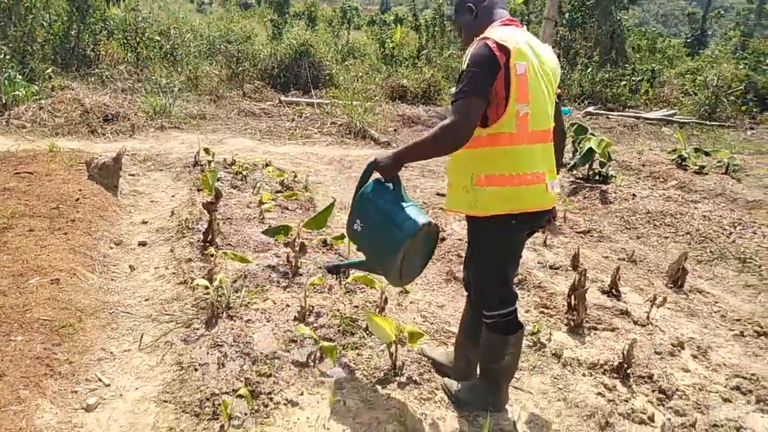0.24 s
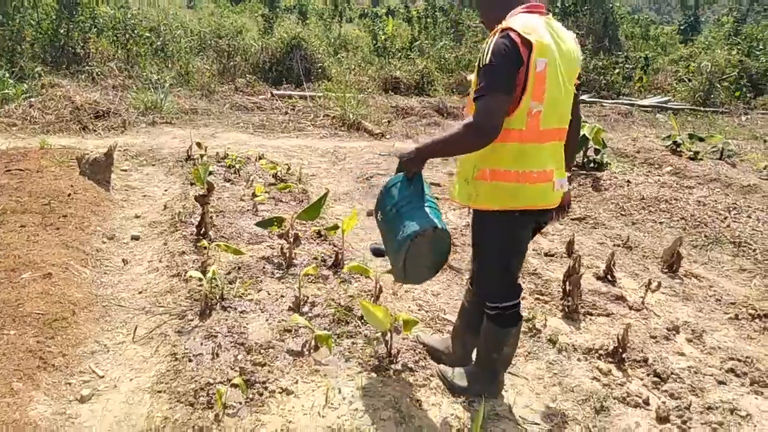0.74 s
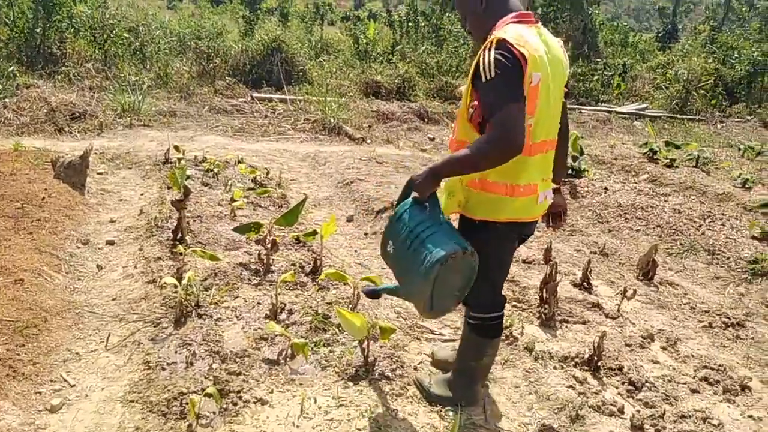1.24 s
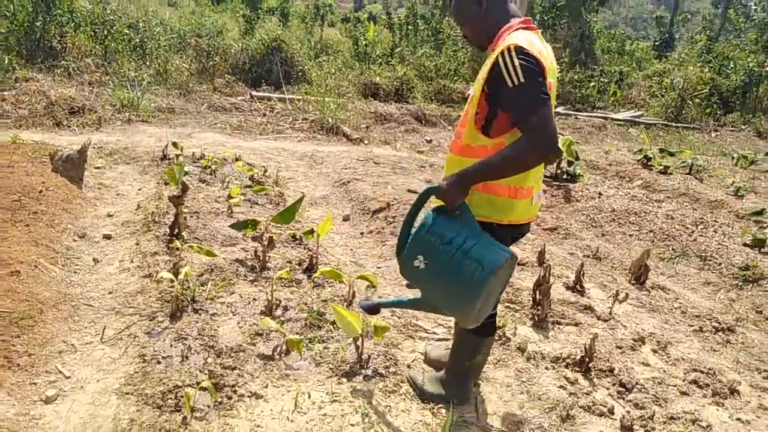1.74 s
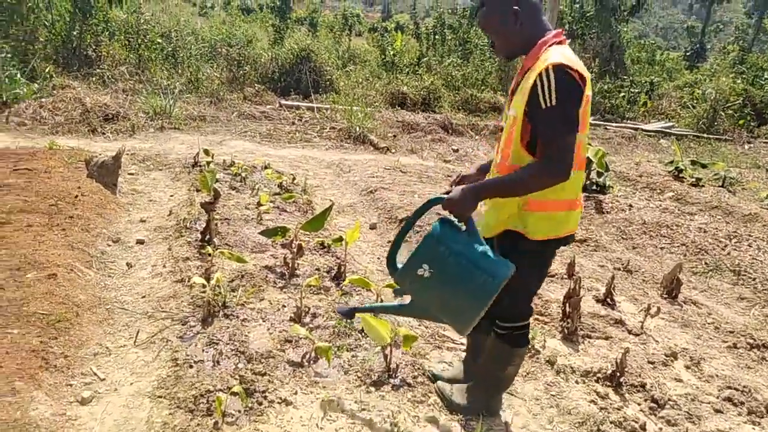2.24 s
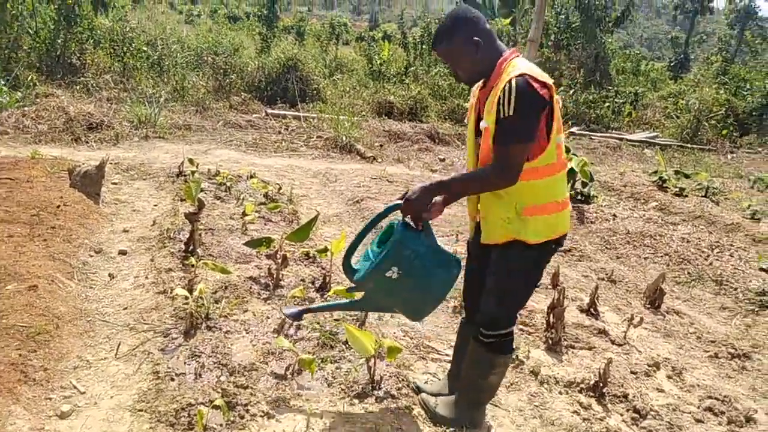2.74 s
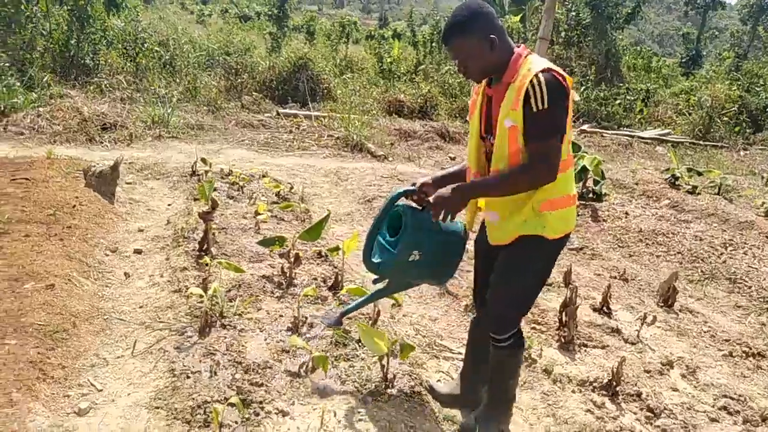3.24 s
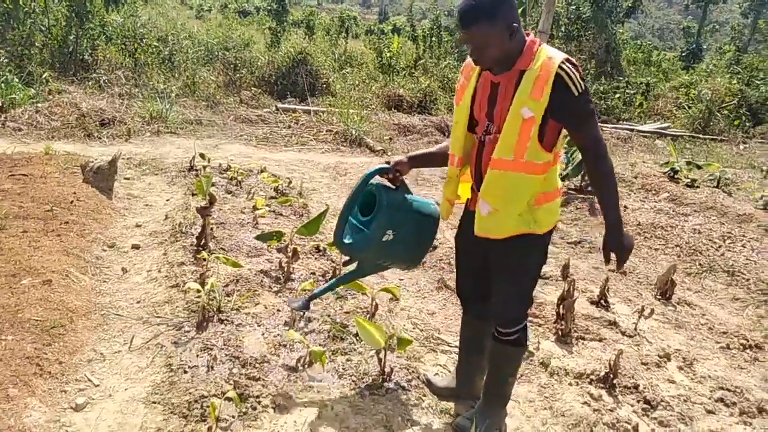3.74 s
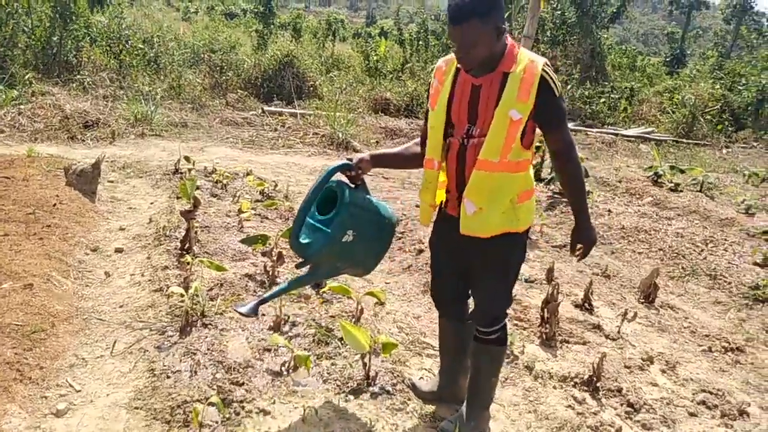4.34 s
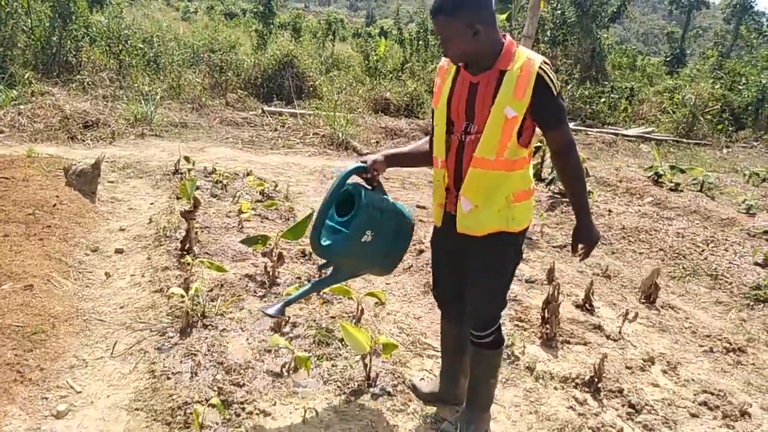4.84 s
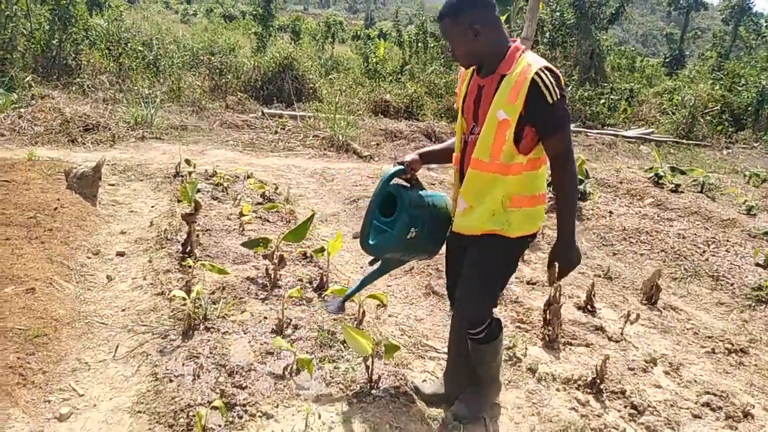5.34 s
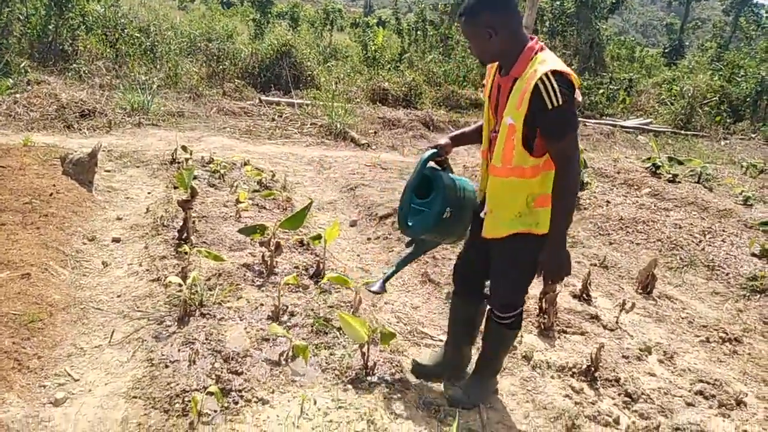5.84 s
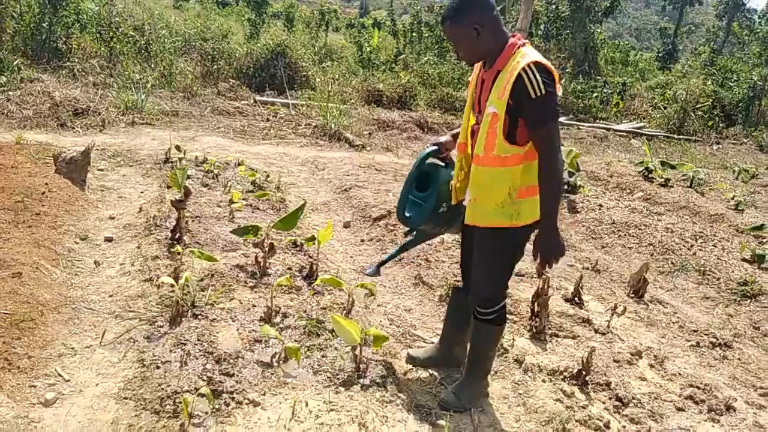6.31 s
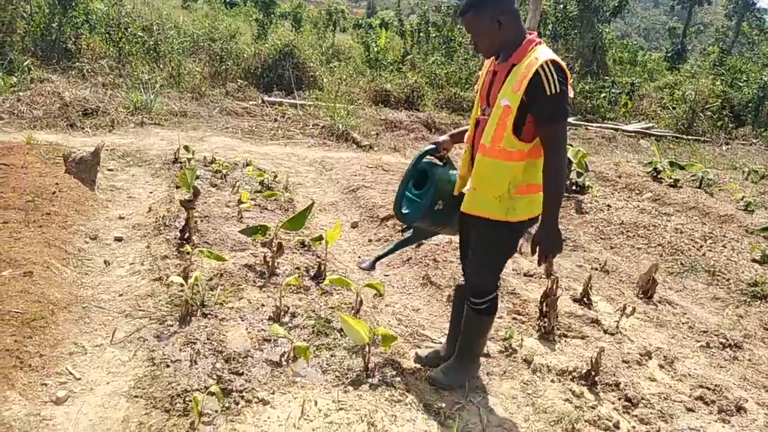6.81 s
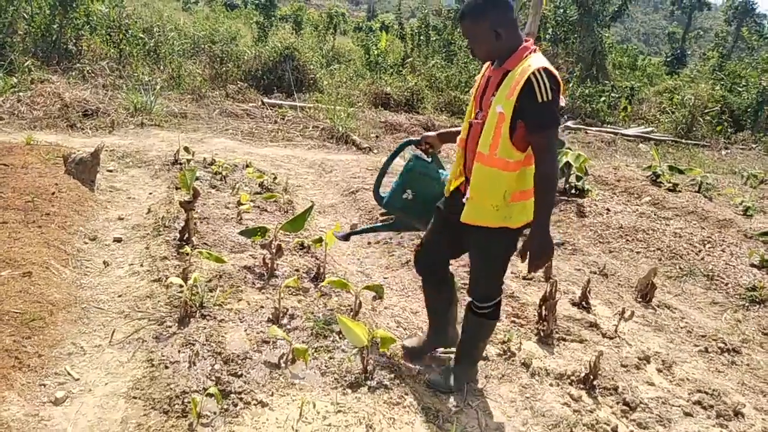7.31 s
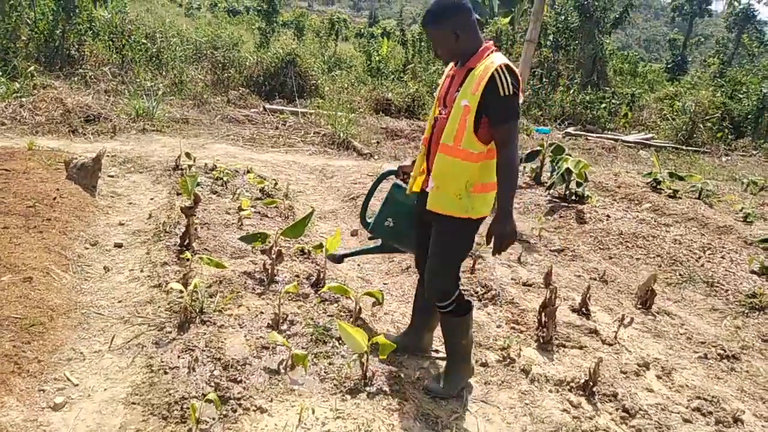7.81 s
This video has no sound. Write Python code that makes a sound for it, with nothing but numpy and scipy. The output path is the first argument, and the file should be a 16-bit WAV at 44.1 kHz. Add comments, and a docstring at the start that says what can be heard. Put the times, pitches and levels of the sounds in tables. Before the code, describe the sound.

Outdoors in a garden, gusts of wind rumble and thump on the microphone, mostly on the right. Close by, rubber boots scuff over dry soil, leaves crackle, and water sloshes and plinks softly in a plastic watering can. The can takes a few hollow knocks, the loudest about three seconds in, followed by a sharp leaf crack. A small bird pipes evenly in the first half; faint chirps and dove coos come later.

```python
"""A garden on a breezy day: a gardener in rubber boots waters seedlings on dry soil near a phone.
Wind eddies buffet the microphone ports, mostly the right. Boots scuff and thud, dry leaves crack,
bubbles plink, water sloshes, the plastic can rings when knocked; short rasps come and go.
A small bird pipes evenly, a dove coos, another bird chirps and an insect's wings buzz,
all over the faint hush of the field."""
import sys
import numpy as np
from scipy import signal
from scipy.fft import rfft, irfft, next_fast_len
from scipy.io import wavfile
from scipy.ndimage import uniform_filter1d

SR = 44100
rng = np.random.default_rng(int(sys.argv[2]) if len(sys.argv) > 2 else 0)


def generate_wav(signal):
    """Clip the signal to [-1, 1] and save it as 16-bit WAV at the path in sys.argv[1]."""
    frames = np.transpose(np.atleast_2d(signal))
    scaled = np.clip(frames, -1, 1) * 32767
    pcm = np.round(scaled).astype(np.int16)
    wavfile.write(sys.argv[1], SR, pcm)


N = 355887
TIME_S = np.arange(N) / SR

# Wind, exposed right port. Each row: time in seconds, two-port mean level in dB, relative edge in dB.
RIGHT_GUSTS = [(0.0, -21, -13.5), (0.49, -32.5, -16), (1.89, -27, -13), (2.13, -26.5, -15),
               (2.49, -24.5, -18.5), (2.83, -29, -18), (3.37, -32.5, -14.5), (3.73, -34.5, -17),
               (4.32, -31, -22), (5.15, -33.5, -13.5), (5.37, -37.5, -14.5), (5.64, -56, -18),
               (5.89, -31.5, -26), (6.22, -41.5, -14.5), (6.43, -28, -11), (6.92, -29, -21.5),
               (7.08, -25.5, -28.5), (7.37, -26, -8.5), (7.6, -33, -4.5), (8.07, -34, -32)]
# Wind, sheltered left port. Each row: time in seconds, level in dB.
LEFT_GUSTS = [(0, -54), (.15, -36), (.45, -63), (.75, -41), (1.3, -35.5), (1.68, -58.5), (1.95, -43),
              (2.25, -61), (2.38, -41), (3.0, -51), (3.6, -56), (3.72, -44), (4.0, -62), (4.62, -46),
              (5.1, -72), (5.3, -49), (5.65, -72), (5.95, -41), (6.35, -59), (6.5, -36), (6.75, -68),
              (7.4, -29.5), (7.8, -53), (8.07, -41)]
# Eddy rumble per port. Each row: frequency in Hz, relative density in dB.
RIGHT_EDDY_SPECTRUM = [(30, -50), (50, -12.5), (80, 5), (100, 6), (140, 2), (200, -9)]
LEFT_EDDY_SPECTRUM = [(30, -57), (50, -1.5), (80, -4.5), (110, -13), (160, -14.5), (220, -44.5)]
# Brief gusts. Each row: start and length in seconds, two-port mean level in dB, relative edge in dB.
RIGHT_BUFFETS = [(0.022, 0.089, -31, -0.5), (0.2, 0.043, -31.5, -6), (0.5, 0.049, -20, -4),
                 (0.58, 0.068, -24, -12.5), (0.736, 0.16, -30, -7.5), (1.092, 0.075, -21, -17),
                 (1.182, 0.084, -21.5, -12), (1.337, 0.06, -19, -15.5), (1.616, 0.099, -26, -3.5),
                 (1.799, 0.039, -26.5, -9), (2.485, 0.032, -16.5, -14.5), (2.616, 0.064, -17.5, -13),
                 (3.091, 0.054, -24.5, -0.5), (3.265, 0.048, -16, -11), (3.521, 0.05, -20.5, -8.5),
                 (3.777, 0.054, -35.5, 1), (4.164, 0.044, -30, -17), (4.665, 0.032, -19.5, -32),
                 (4.757, 0.03, -19.5, -17.5), (4.838, 0.054, -22, -16.5), (4.958, 0.029, -13, -19.5),
                 (5.063, 0.036, -17, -7.5), (5.169, 0.0835, -25.5, -17), (5.544, 0.039, -24.5, -34),
                 (5.647, 0.1, -37, -17), (5.891, 0.053, -25.5, -30), (6.14, 0.046, -21, -7),
                 (6.265, 0.057, -30, -6), (6.553, 0.062, -29.5, -3.5), (6.655, 0.11, -28.5, -1),
                 (6.971, 0.022, -13, -21), (7.061, 0.18, -30.5, 2), (7.784, 0.053, -30, -20)]
# Single eddies. Each row: start in seconds, two-port mean peak in dB, pitch in Hz.
EDDY_SLAPS = [(0.034, -13, 140), (0.076, -10, 123), (0.366, -14.5, 138), (0.503, -13, 103),
              (0.736, -17.5, 95), (1.003, -14, 107), (1.102, -21, 160), (1.542, -10, 118),
              (1.613, -12, 129), (1.632, -9.5, 104), (1.644, -4.5, 105.5), (1.653, -33, 336),
              (1.674, -5.5, 110), (1.792, -9.5, 130), (1.827, -8, 123), (1.848, -13, 143),
              (2.022, -12.5, 150), (2.353, -16.5, 157), (2.388, -16.5, 140), (2.498, -10.5, 121),
              (2.592, -10.5, 105), (2.875, -16, 123), (3.108, -14.5, 126), (3.298, -17.5, 181),
              (3.489, -15.5, 126), (3.8, -9.5, 129.6), (4.167, -20, 166), (4.198, -21, 132),
              (4.318, -21, 130), (4.663, -13, 129), (4.677, -16.5, 159), (4.771, -15.5, 135),
              (4.845, -20.5, 138), (4.956, -12, 132), (4.979, -24, 150), (5.969, -18.5, 138), (6, -17, 129),
              (6.158, -18.5, 85.5), (6.261, -18, 107), (6.294, -18, 132), (6.308, -13.5, 165),
              (6.308, -25.5, 380), (6.42, -13.5, 126), (6.361, -16.5, 133), (6.554, -9, 124),
              (6.661, -9, 158), (6.713, -6.5, 157), (6.981, -8.5, 141), (7.0801, -4.5, 128),
              (7.0831, -18, 320), (7.141, -8, 132), (7.185, -18, 375), (7.193, -9, 135), (7.359, -12, 127),
              (7.478, -12.5, 117), (7.649, -14.5, 120), (7.749, -15, 105)]
# Brief pops as the hardest wind slaps overload the right channel. Each row: start in seconds, peak in dB.
OVERLOAD_POPS = [(1.651, -21), (1.856, -31.5), (6.692, -33), (7.085, -17.5), (7.188, -49)]
# Constant rustle. Each row: time in seconds, level in dB, spray in dB relative to the treble.
RUSTLE_BED = [(0, -56.5, -19), (.45, -58.5, 4.5), (.72, -79, -19.5), (1.3, -52.5, -5.5), (1.6, -56.5, -5),
              (2.2, -73.5, -12.5), (2.6, -56, -6.5), (3.1, -61, -9.5), (3.45, -46, -1.5), (3.8, -67.5, -3),
              (4.3, -66, 3), (4.9, -52, 0.5), (5.6, -56, -11.5), (5.78, -59.5, -1.5), (6.3, -60.5, -1),
              (7.05, -71, -11.5), (7.45, -80, -5), (7.7, -53.5, -4.5), (8.07, -54, -5)]
# Boots and brushed leaves. Each row: peak time and rise in seconds, treble in dB,
# fall in dB per second, grit in dB relative to the treble.
BOOT_SCUFFS = [(.02, 0.033, -45.5, 104.5, -13), (.13, 0.11, -47, 131.5, -12), (.52, 0.054, -45, 116.5, -16),
               (0.648, 0.0092, -47, 185.5, -13), (0.804, 0.075, -33, 183, -5),
               (0.971, 0.084, -39.5, 63, -11), (1.109, 0.036, -43.5, 116, 1.5),
               (1.248, 0.4, -39, 175, -2.5), (1.871, 0.061, -45, 64.5, -19), (2.09, 0.092, -44, 123, 1.5),
               (2.341, 0.056, -41.5, 95.5, -5), (2.43, 0.033, -59.5, 75.5, 7), (2.54, 0.031, -53, 129, -35),
               (2.671, 0.011, -44.5, 109, -3), (2.757, 0.086, -44.5, 154, -0.5),
               (3.03, 0.078, -45.5, 134.5, -9), (3.29, 0.18, -48.5, 67, -20),
               (3.373, 0.024, -28.5, 350.5, -11.5), (3.386, 0.0044, -51, 500, -11),
               (3.54, 0.052, -65, 92, -12), (3.95, 0.23, -54.5, 41, -38), (4.291, 0.0061, -60, 386, -25),
               (4.37, 0.056, -49, 119.5, -29), (4.557, 0.027, -45.5, 126.5, -8.5),
               (4.829, 0.017, -47.5, 66.5, -7), (5.15, 0.18, -40, 40.5, -9), (5.3, 0.025, -48.5, 254, -36),
               (5.398, 0.042, -41.5, 93, -4), (5.839, 0.038, -44.5, 103.5, -19),
               (5.991, 0.0069, -38.5, 112, -1), (6.048, 0.074, -37, 206, -3), (6.532, 0.026, -50, 106, -46),
               (6.707, 0.017, -43.5, 158.5, -7), (6.796, 0.062, -37.5, 108, -10.5),
               (6.87, 0.15, -44, 160.5, -4.5), (6.888, 0.0037, -38, 706, -4),
               (7.121, 0.012, -43.5, 347, -16), (7.291, 0.05, -46.5, 117, -15),
               (7.525, 0.026, -36.5, 157.5, -11.5), (7.85, 0.088, -48, 77.5, -22)]
# Scuff layers. Each row: frequency in Hz, relative density in dB.
TREBLE_SPECTRUM = [(4300, -47), (5200, -10), (5900, 12.5), (7000, 16.5), (8200, 13), (9500, -14),
                   (10500, -61.5)]
GRIT_SPECTRUM = [(1100, 0), (1600, 8), (2200, 0.5), (3400, 4), (4400, 10.5)]
# Steps jolting the can. Each row: start in seconds, thud and slosh in dB, rise and t60 in seconds.
FOOTFALLS = [(0.0, -65, -45.5, 0.0093, 0.36), (0.743, -33, -37, 0.06, 0.5),
             (0.927, -34.5, -48.5, 0.0021, 0.58), (1.1, -75, -42.5, 0.028, 0.2),
             (1.24, -66, -46, 0.0079, 0.22), (1.93, -67, -55, 0.01, 0.51), (2.02, -49, -77, 0.013, 0.17),
             (2.299, -35.5, -60, 0.0042, 0.51), (2.399, -74, -59, 0.011, 0.72),
             (2.51, -74, -71, 0.0078, 0.088), (2.645, -57, -48, 0.0024, 0.72), (2.99, -49, -67, 0.011, 1),
             (3.358, -43.5, -40, 0.0029, 0.35), (3.54, -69, -64, 0.021, 0.46),
             (4.44, -75, -58, 0.053, 0.52), (5.12, -68, -53, 0.0064, 0.69),
             (5.388, -39.5, -49.5, 0.0039, 0.32), (5.998, -35.5, -64, 0.061, 0.18),
             (6.319, -60, -55, 0.014, 0.16), (6.8, -47, -47.5, 0.0062, 1),
             (6.866, -27.5, -43.5, 0.0027, 0.13)]
# Field hush. Each row: frequency in Hz, density in dB per Hz.
HUSH_SPECTRUM = [(200, -91), (500, -106), (1000, -105), (2500, -107), (5300, -112), (6000, -99),
                 (8000, -108), (9500, -107), (11500, -112), (14000, -116)]
# Piping bird. Each row: beat number, level in dB.
PIPE_NOTES = [(0, -46), (1, -45.5), (3, -42.5), (4, -40.5), (5, -41.5), (6, -46.5), (7, -45), (8, -46.5),
              (9, -60.5), (10, -52), (11, -46.5), (12, -44), (13, -43.5), (14, -52), (15, -52.5)]
# Dove. Each row: start and length in seconds, level in dB.
COO_NOTES = [(.07, 0.033, -55), (4.69, 0.057, -60), (5.86, 0.075, -63), (6.25, 0.099, -57),
             (6.71, 0.13, -53), (7.14, 0.091, -58.5), (7.47, 0.11, -60), (7.85, 0.13, -59.5)]
# Dry leaves and drops, then duller clods underfoot. Each row: start in seconds, peak in dB, pitch in Hz.
LEAF_CRACKS = [(0.081, -29.5, 7460), (0.2726, -37, 8040), (0.299, -33, 7340), (0.4968, -31, 9600),
               (0.5243, -26.5, 6860), (0.6404, -33, 5900), (1.1218, -24.5, 6700), (1.3252, -30, 7400),
               (1.393, -33, 6600), (1.5738, -29.5, 8050), (1.8128, -44, 7450), (1.8583, -24, 7600),
               (1.892, -43, 7200), (2.135, -44, 7500), (2.18, -44.5, 7700), (2.357, -32.5, 8500),
               (2.377, -33, 6650), (2.422, -46, 7700), (2.5257, -32, 6200), (2.5461, -34, 6400),
               (2.675, -36.5, 7600), (2.7304, -30, 6960), (3.1666, -32.5, 6400), (3.221, -36, 6460),
               (3.24, -36, 9500), (3.2835, -32, 7100), (3.299, -31, 7670), (3.316, -32, 7100),
               (3.402, -37, 9600), (3.3648, -23, 7500), (3.372, -23, 7600), (3.387, -12, 6870),
               (3.393, -28, 9200), (3.4596, -19, 6770), (3.5258, -34, 7300), (3.5482, -35, 6860),
               (3.5632, -33, 6960), (3.639, -54, 7600), (3.6625, -37, 7300), (3.7054, -39, 6840),
               (3.8415, -37.5, 7400), (3.85, -39, 10000), (3.9114, -37, 7660), (3.9269, -34, 6500),
               (3.937, -49, 8800), (3.9957, -37, 7500), (4.002, -32, 7500), (4.015, -40, 8600),
               (4.0865, -37, 7700), (4.157, -38, 8600), (4.289, -31, 7030), (4.302, -40, 6700),
               (4.3593, -26.5, 9660), (4.542, -35, 7500), (4.555, -25.5, 8900), (4.574, -39, 9300),
               (4.599, -31, 7300), (4.806, -28, 8160), (4.823, -36, 9400), (4.8668, -27.5, 7600),
               (4.879, -35, 8400), (4.916, -35, 4670), (4.9442, -28.5, 7300), (5.0629, -25, 8800),
               (5.2972, -24.5, 6950), (5.311, -27.5, 6650), (5.383, -34, 5200), (5.396, -27.5, 6950),
               (5.439, -26, 7550), (5.458, -39, 8500), (5.5333, -34.5, 7000), (5.6093, -30.5, 7060),
               (5.565, -41, 5630), (5.89, -39, 7500), (5.905, -36, 7800), (5.978, -33, 6400),
               (6.118, -33.5, 8300), (5.6435, -49, 8150), (5.7208, -52, 6750), (5.8216, -42, 6500),
               (5.8375, -34, 7940), (6.2472, -43.5, 6640), (6.5157, -34, 7200), (6.7047, -23, 6700),
               (6.8216, -31, 7360), (6.8801, -26.5, 7760), (7.1025, -36.5, 6240), (7.1227, -40, 7060),
               (7.282, -36, 5400), (7.4976, -36, 6270), (7.52, -43, 5300), (7.5921, -32.5, 7070),
               (7.668, -43, 7300), (7.845, -35, 8500), (7.883, -35, 5600), (7.965, -39, 9400),
               (8.0341, -34, 7300)]
CLOD_CRUNCHES = [(0.765, -35, 1420), (0.787, -34, 1450), (0.775, -34.5, 1980), (0.80, -38, 2080),
                 (0.812, -35, 1820), (0.822, -37, 2130), (0.838, -34, 1460), (1.121, -30, 3680),
                 (2.018, -49, 2050), (2.65, -51, 1950), (2.651, -68, 2400), (2.652, -42, 1070),
                 (2.675, -50, 1140), (2.755, -36.5, 1410), (2.85, -46.5, 1350), (3.365, -43, 1970),
                 (3.387, -34.5, 2180), (3.389, -48, 3570), (5.11, -52, 1610), (5.145, -50, 1590),
                 (6.02, -39, 2420), (6.05, -58, 1520), (6.075, -41.5, 2330), (6.318, -51, 1630),
                 (6.79, -38.5, 2780), (6.823, -38, 2940), (6.889, -36.5, 2400), (6.889, -39.5, 1320),
                 (6.918, -48, 1320), (6.968, -53, 1280)]
# Bubbles in and under the can, plus one short ringing crunch underfoot at 0.935 s. Each row: start in seconds,
# peak in dB, pitch in Hz, decay in cycles.
BUBBLES = [(0.444, -34.5, 1640, 13), (0.4966, -40.5, 1490, 3.5), (0.5467, -54, 1050, 14),
           (0.572, -52, 1100, 14), (0.635, -43, 1035, 9.9), (0.6886, -38.5, 1090, 9.4),
           (0.935, -36.5, 1140, 4), (1.1208, -52, 1340, 4.7), (1.353, -48, 1040, 12),
           (1.3923, -45, 1070, 5.7), (2.039, -40, 1070, 8.6), (2.0657, -42, 1960, 16),
           (2.104, -41.5, 1100, 10), (2.085, -39, 2060, 14), (2.345, -49, 1400, 12), (2.398, -46, 1390, 12),
           (2.43, -48, 1500, 14), (2.47, -51, 1400, 12), (2.495, -47, 1460, 11), (2.462, -43, 3900, 35),
           (2.655, -44, 1930, 25), (2.657, -48, 2430, 26), (2.5145, -30.5, 1260, 7.3),
           (2.736, -27.5, 1640, 4.8), (2.742, -30.5, 1410, 4.5), (4.3844, -50, 2250, 16),
           (4.417, -49.5, 1080, 10), (4.368, -49.5, 1940, 50), (4.419, -48, 1590, 5.5),
           (4.456, -47, 1340, 12), (4.506, -38.5, 1620, 15), (4.53, -47, 1670, 8.7),
           (4.556, -42, 1540, 6.3), (4.5035, -34, 1180, 6.7), (4.5542, -44, 1080, 7.7),
           (5.398, -36, 820, 7), (5.455, -44.5, 750, 5.5), (5.49, -54, 816, 6), (7.023, -58, 1180, 14),
           (7.041, -56, 1100, 15)]
# Short rasps. Each row: start and length in seconds, centre in Hz, level in dB.
RASP_BURSTS = [(0.579, 0.071, 2050, -61), (1.629, 0.12, 1890, -56.5), (1.847, 0.078, 1870, -52.5),
               (1.978, 0.092, 2030, -49.5), (5.54, 0.081, 5400, -43.5), (3.704, 0.063, 2170, -60.5),
               (6.29, 0.15, 1880, -46.5)]
# Insect buzz. Each row: time in seconds, centre in Hz, level in dB.
BUZZ_PATH = [(1.27, 7500, -41), (1.5, 7350, -41.5), (1.58, 7470, -38), (1.75, 7420, -43), (1.84, 7440, -46)]
# Knocks on the can. Each row: start in seconds, level in dB, hollow share from 0 to 1.
CAN_KNOCKS = [(2.301, -28.5, 0), (2.515, -42.5, 0.84), (2.648, -38.5, 1), (2.668, -38.5, 0.8),
              (2.735, -36.5, 0.83), (2.969, -16.5, 0.07), (3.001, -23, 1), (3.363, -37, 0)]
# Two wall modes, then the hollow ring. Each row: frequency in Hz, gain in dB, t60 in seconds.
CAN_MODES = [(300, 15.5, 0.019), (638, 3.5, 0.022), (617, -11, 0.23), (683, -2.5, 0.21), (824, -3, 0.065),
             (860, -21, 0.063)]
# Far bird. Each row: start and length in seconds, pitch in Hz, level in dB.
CHIRP_NOTES = [(4.012, 0.017, 4380, -42.5), (4.085, 0.017, 4250, -60), (4.15, 0.11, 3020, -54),
               (4.18, 0.058, 2607, -52.5), (4.235, 0.025, 3080, -52.5), (4.39, 0.022, 2705, -45.5),
               (4.51, 0.017, 2820, -45), (4.57, 0.03, 3020, -51.5), (4.695, 0.026, 2560, -48),
               (4.785, 0.024, 2870, -54), (4.848, 0.024, 2750, -46), (4.905, 0.024, 3060, -45),
               (4.925, 0.019, 2510, -47), (4.97, 0.023, 2880, -50), (5.15, 0.034, 2880, -48.5),
               (5.315, 0.018, 2730, -44.5), (5.44, 0.027, 2630, -50), (6.205, 0.033, 3960, -64),
               (6.645, 0.019, 4000, -46.5), (6.665, 0.016, 3600, -62), (7.3, 0.029, 2704, -56),
               (7.75, 0.016, 3140, -42), (7.765, 0.035, 4160, -52)]


def undb(db):
    """dB to gain."""
    return np.exp(np.asarray(db) * (np.log(10) / 20))


def unit(x):
    """Scale to rms 1."""
    return x / np.sqrt(np.mean(x ** 2))


def curve(rows, column, outside=None):
    """Table column, interpolated linearly in time."""
    rows = np.array(rows)
    return np.interp(TIME_S, rows[:, 0], rows[:, column], outside, outside)


def log_bins(size):
    """Log frequency of each FFT bin."""
    return np.log(np.arange(size // 2 + 1) * SR / size + 1)


def colour(x, points, edge_db_per_oct=-40):
    """Filter by (Hz, dB) points, with two-octave skirts."""
    hz, db = np.transpose(points)
    hz = np.r_[hz[0] / 4, hz, hz[-1] * 4]
    db = np.r_[db[0] + 2 * edge_db_per_oct, db, db[-1] + 2 * edge_db_per_oct]
    size = next_fast_len(N)
    gain = undb(np.interp(log_bins(size), np.log(hz), db))
    return irfft(rfft(x, size) * gain, size)[..., :N]


def band(x, lo_hz, hi_hz):
    """Band-pass."""
    sos = signal.butter(2, [lo_hz, min(hi_hz, .45 * SR)], "band", fs=SR, output="sos")
    return signal.sosfilt(sos, x)


def walk(rate_hz):
    """Smoothed random steps, rms 1."""
    hold = int(SR / rate_hz)
    held = np.repeat(rng.standard_normal(N // hold + 1), hold)
    return unit(uniform_filter1d(uniform_filter1d(held, hold), hold)[:N])


def patchy(x, points, flicker_db, rate_hz, bands):
    """Colour x; overlapping bands flicker independently. Rms 1."""
    size = next_fast_len(N)
    spectrum = rfft(colour(x, points, edge_db_per_oct=-16), size)
    place = np.interp(log_bins(size), np.log([points[0][0], points[-1][0]]), [0, bands - 1])
    weights = (np.clip(1 - np.abs(place - k), 0, 1) for k in range(bands))
    parts = (irfft(spectrum * weight, size)[..., :N] for weight in weights)
    return unit(sum(undb(flicker_db * walk(rate_hz)) * part for part in parts))


def add(track, start_s, sound):
    """Mix sound into track."""
    i = max(int(start_s * SR), 0)
    sound = sound[..., :N - i]
    track[..., i:i + sound.shape[-1]] += sound


def ports(x, pan_db, lag_ms):
    """Mono to both ports; positive values make the left louder and later."""
    return np.array([np.roll(x, int(lag_ms * SR / 1000)) * undb(pan_db / 2), x * undb(-pan_db / 2)])


def echoes(x, wet_db, t60_s):
    """Add scatter from trees and slopes, different per port."""
    t = np.arange(int(t60_s * SR)) / SR
    tail = rng.standard_normal((2, len(t))) * 1000. ** (-t / t60_s) * np.clip(t / .06, 0, 1)
    tail /= np.sqrt(np.sum(tail ** 2, axis=1, keepdims=True))
    return x + undb(wet_db) * signal.oaconvolve(x, tail, axes=1)[:, :N]


def grains(per_s, spread_db, smear_ms):
    """Three noises sharing one envelope of short, uneven grains."""
    hits = (rng.random(N) < per_s / SR) * undb(spread_db * np.minimum(rng.exponential(size=N), 3))
    power = signal.lfilter([1], [1, -np.exp(-1000 / (smear_ms * SR))], hits)
    return unit(np.sqrt(power + 1e-9) * rng.standard_normal((3, N)))


def notes(rows, edge_s, sharp, settle_s, rough, rough_hz):
    """Bird notes that start sharp and settle; moving air roughens their level."""
    out = np.zeros(N)
    for start_s, length_s, hz, db in rows:
        t = np.arange(int((length_s + edge_s) * SR)) / SR
        shape = np.sin(np.pi / 2 * np.clip(np.minimum(t, t[-1] - t) / edge_s, 0, 1)) ** 2
        pitch_hz = hz * (1 + sharp * np.exp(-t / settle_s))
        add(out, start_s - edge_s / 2, undb(db) * shape * np.sin(2 * np.pi * np.cumsum(pitch_hz) / SR))
    return out * (1 + rough * walk(rough_hz))


def wind():
    """Eddies rumble over both ports; the right also gets a brighter edge, slaps and pops."""
    throb = undb(2.73 * walk(28))
    rumble = unit(throb * colour(rng.standard_normal(N), RIGHT_EDDY_SPECTRUM))
    edge_hz_db = [(220, 5.5), (330, -7.5), (450, -27), (800, -46.5)]
    edge = unit(throb * undb(walk(48)) * colour(rng.standard_normal(N), edge_hz_db))
    rumble_gain = undb(curve(RIGHT_GUSTS, 1))
    edge_gain = rumble_gain * undb(curve(RIGHT_GUSTS, 2))
    ramp_s = .0162
    for start_s, length_s, db, edge_db in RIGHT_BUFFETS:
        inside_s = np.minimum(TIME_S - start_s, start_s + length_s - TIME_S)
        shape = np.clip(inside_s / ramp_s + .5, 0, 1) ** 2
        rumble_gain = np.hypot(rumble_gain, undb(db) * shape)
        edge_gain = np.hypot(edge_gain, undb(db + edge_db) * shape)
    right = 2 * (rumble_gain * rumble + edge_gain * edge)  # one port: twice the mean
    for start_s, db, hz in EDDY_SLAPS:
        t = np.arange(int(1.8 * SR / hz)) / SR
        slap = -np.hanning(len(t)) * np.cos(2 * np.pi * hz * (t - t[-1] / 2))
        add(right, start_s, 2 * undb(db) * slap)
    for start_s, db in OVERLOAD_POPS:
        t = np.arange(SR // 50) / SR
        pop = band(t * np.exp(-t / .0014), 260, 2300)
        add(right, start_s, -undb(db) * pop / pop.max())
    left = unit(undb(1.4 * walk(3)) * colour(rng.standard_normal(N), LEFT_EDDY_SPECTRUM))
    return np.array([undb(curve(LEFT_GUSTS, 1)) * left, right])


def scuffs():
    """Boots and leaves shift dry grains: bright rustle, duller grit, fine spray."""
    rustle_gain, grit_gain = undb(curve(RUSTLE_BED, 1)), 0
    rise_db = 20.5
    for peak_s, rise_s, db, fall_db_per_s, grit_db in BOOT_SCUFFS:
        t = TIME_S - peak_s
        shape = undb(db + np.where(t < 0, rise_db * t / rise_s, -fall_db_per_s * t))
        rustle_gain = np.hypot(rustle_gain, shape)
        grit_gain = np.hypot(grit_gain, undb(grit_db) * shape)
    # hard scuffs merge the grains into a rush
    merged = np.clip((20 * np.log10(rustle_gain) + 48.5) / 20 + .7, .35, .92)
    sparse = grains(per_s=220, spread_db=11.5, smear_ms=4.4)
    dense = grains(per_s=3100, spread_db=5, smear_ms=3)
    noise = np.sqrt(1 - merged) * sparse + np.sqrt(merged) * dense
    stereo = .47 * ports(noise[0], pan_db=0, lag_ms=-.08) + .95 * noise[1:]  # shared + scattered
    treble = patchy(stereo, TREBLE_SPECTRUM, flicker_db=5.5, rate_hz=60, bands=18)
    grit = patchy(stereo, GRIT_SPECTRUM, flicker_db=5.5, rate_hz=45, bands=16)
    spray = patchy(stereo, [(10000, 1.5), (11500, -7), (14200, -6.5)], flicker_db=5, rate_hz=40, bands=6)
    spray *= undb([[3], [-3]]) * undb(curve(RUSTLE_BED, 2))
    return rustle_gain * (treble + spray) + grit_gain * grit


def steps():
    """A boot thuds on soil; water sloshes in the jolted can."""
    thud_gain, slosh_gain = np.zeros((2, N))
    for start_s, thud_db, slosh_db, rise_s, t60_s in FOOTFALLS:
        t = np.arange(int(t60_s * SR)) / SR
        shape = np.clip(t / rise_s, 0, 1) * 1000. ** (-np.maximum(t - rise_s, 0) / t60_s)
        add(thud_gain, start_s, undb(thud_db) * shape)
        add(slosh_gain, start_s, undb(slosh_db) * shape)
    thud = unit(colour(rng.standard_normal(N), [(170, 13.5), (230, 4.5), (330, 3.5), (460, -4)]))
    slosh_hz_db = [(480, -12.5), (680, 8), (950, -11.5), (1400, 1.5), (1900, -10.5), (2400, -5)]
    slosh = patchy(rng.standard_normal(N), slosh_hz_db, flicker_db=5.5, rate_hz=41, bands=7)
    return ports(thud_gain * thud + slosh_gain * slosh, pan_db=-4, lag_ms=.12)


def hush():
    """Faint, wavering noise of the field and its far insects."""
    noise = rng.standard_normal((2, N))
    rms = np.std(colour(noise, HUSH_SPECTRUM)) * np.sqrt(SR / 2)
    return rms * patchy(noise, HUSH_SPECTRUM, flicker_db=3.5, rate_hz=12, bands=12)


def piping_bird(start_s=.049, beat_s=.2462, length_s=.056, pitch_hz=1470):
    """One falling note on an even beat, to the right."""
    rows = [(start_s + round(beat) * beat_s, length_s, pitch_hz, db) for beat, db in PIPE_NOTES]
    song = notes(rows, edge_s=.012, sharp=.13, settle_s=.019, rough=.5, rough_hz=140)
    return echoes(ports(song, pan_db=-8.5, lag_ms=.43), wet_db=-11, t60_s=.7)


def dove(pitch_hz=523):
    """Soft, far coos of nearly level pitch."""
    rows = [(start_s, length_s, pitch_hz, db) for start_s, length_s, db in COO_NOTES]
    song = notes(rows, edge_s=.05, sharp=.014, settle_s=.04, rough=.69, rough_hz=210)
    return echoes(ports(song, pan_db=.5, lag_ms=.05), wet_db=-2.5, t60_s=.22)


def cracks(patter_count=320, patter_hz=8600, droplet_share=.3, droplet_cycles=18):
    """Leaves, drops and clods: each a burst of splinters plus a brief droplet ring."""
    out, t = np.zeros((2, N)), np.arange(SR // 30) / SR
    # small random cracks follow the rustle level
    patter_db = curve(RUSTLE_BED, 1) + 7.5
    moments = rng.integers(N, size=patter_count)
    patter = [(i / SR, patter_db[i] + 3.5 * level_dev, patter_hz * np.exp(.13 * pitch_dev))
              for i, (level_dev, pitch_dev) in zip(moments, rng.standard_normal((patter_count, 2)))]
    for start_s, db, hz in patter + list(LEAF_CRACKS) + list(CLOD_CRUNCHES):
        noise = rng.standard_normal((2, len(t)))
        noise = noise + .055 * noise[::-1]  # bleed between ports
        shape = (1 - np.exp(-t * hz / 5)) * (np.exp(-t * hz / 7) + .1 * np.exp(-t * hz / 40))
        splinters = band(band(shape * noise, hz * .84, hz * 1.4), hz * .84, hz * 1.4)
        droplet_hz = hz * np.exp(.1 * noise[1, -1])
        age = t * droplet_hz / droplet_cycles
        droplet = np.minimum(8 * age, 1) * np.exp(-3 * age) * np.sin(2 * np.pi * droplet_hz * t)
        click = (1 - droplet_share) * splinters / np.max(np.abs(splinters)) + droplet_share * droplet
        click /= np.max(np.abs(click), axis=1, keepdims=True)
        pan_db = -1.5 + 3 * noise[0, -1]
        add(out, start_s, np.sqrt(2) * undb(db + np.array([[pan_db], [-pan_db]]) / 2) * click)
    return out


def plinks():
    """A trapped bubble rings, gliding up as it nears the surface; one short crunch underfoot rings the same
    way."""
    out = np.zeros(N)
    for start_s, db, hz, cycles in BUBBLES:
        t = np.arange(int(2 * cycles * SR / hz)) / SR
        age = t * hz / cycles
        shape = (1 - np.exp(-t / .0039)) * np.exp(-2.5 * age)
        tone = np.sin(2 * np.pi * hz * t * (1 + .0033 * age))
        add(out, start_s, undb(db) * shape / shape.max() * tone)
    return echoes(ports(out, pan_db=-4, lag_ms=.12), wet_db=-11, t60_s=.13)


def rasps():
    """Quick, uneven scrapes, each through one resonance."""
    out = np.zeros(N)
    scrape = undb(3.5 * walk(150)) * rng.standard_normal(N)
    for start_s, length_s, hz, db in RASP_BURSTS:
        i, n = int(start_s * SR), int(length_s * SR)
        rasp = unit(band(scrape[i:i + n], hz * .915, hz * 1.14))
        add(out, start_s, undb(db) * np.hanning(n) ** 3.2 * rasp)
    return echoes(ports(out, pan_db=.5, lag_ms=-.1), wet_db=-6, t60_s=.19)


def insect(stroke_hz=180):
    """Wing strokes scrape a narrow resonance."""
    stroke = np.cos(np.pi * np.cumsum(stroke_hz * (1 + .14 * walk(40.6))) / SR) ** 2
    scrape = unit(band(rng.standard_normal(N), 30, 280))
    carrier = np.sin(2 * np.pi * np.cumsum(curve(BUZZ_PATH, 1)) / SR)
    buzz = unit((2.7 + stroke) * scrape * carrier)
    return ports(buzz * undb(curve(BUZZ_PATH, 2, outside=-150)), pan_db=1, lag_ms=.1)


def knocks():
    """A soft push rings the can's wall; the air inside rings on, rattling."""
    out, t = np.zeros(N), np.arange(SR // 3) / SR
    modes = [undb(db) * 1000. ** (-t / t60_s) * np.sin(2 * np.pi * hz * t) for hz, db, t60_s in CAN_MODES]
    wall, air = sum(modes[:2]), sum(modes[2:])
    for start_s, db, hollow in CAN_KNOCKS:
        rattle = 1 + .33 * unit(uniform_filter1d(rng.standard_normal(len(t)), 300))
        ring = (1 - hollow) * wall + hollow * rattle * air
        add(out, start_s, undb(db) * uniform_filter1d(ring, 16) * np.clip(t / .0049, 0, 1))
    return echoes(ports(out, pan_db=-1.3, lag_ms=.03), wet_db=-10, t60_s=.17)


def chirping_bird():
    """Far, rough chirps, each falling fast."""
    song = notes(CHIRP_NOTES, edge_s=.01, sharp=.16, settle_s=.011, rough=1.1, rough_hz=500)
    return echoes(ports(song, pan_db=.63, lag_ms=.14), wet_db=-9, t60_s=.28)


def scene():
    """All sources summed at the two ports."""
    return (hush() + wind() + scuffs() + steps() + piping_bird() + dove() + cracks()
            + plinks() + rasps() + insect() + knocks() + chirping_bird())


def record(dry, bass_hz=50, clip_level=1.04, dull_hz=14200, top_hz=15300):
    """The phone thins deep bass, clips the hardest slaps, dulls high treble and cuts the top."""
    thin = signal.sosfilt(signal.butter(4, bass_hz, "high", fs=SR, output="sos"), dry)
    clipped = np.clip(thin, -clip_level, clip_level)
    dull = signal.sosfilt(signal.ellip(4, .5, 22, dull_hz, fs=SR, output="sos"), clipped)
    return signal.sosfilt(signal.ellip(10, .2, 70, top_hz, fs=SR, output="sos"), dull)


dry = scene()
out = record(dry)
generate_wav(out)
```